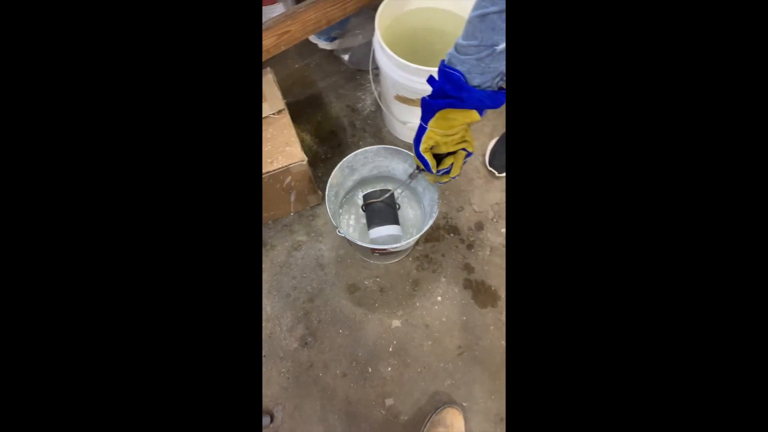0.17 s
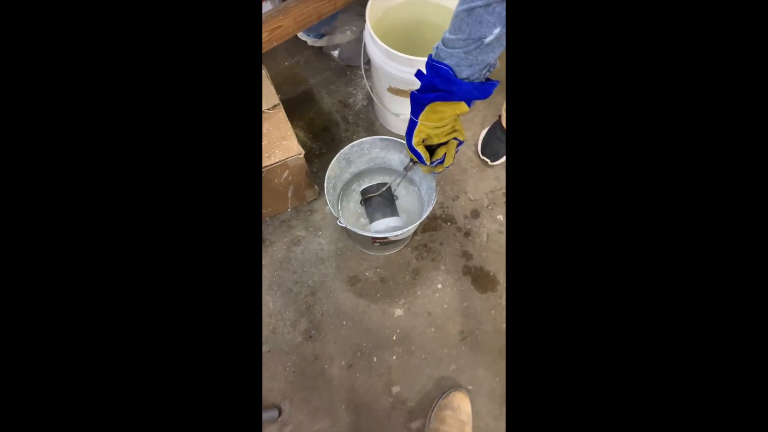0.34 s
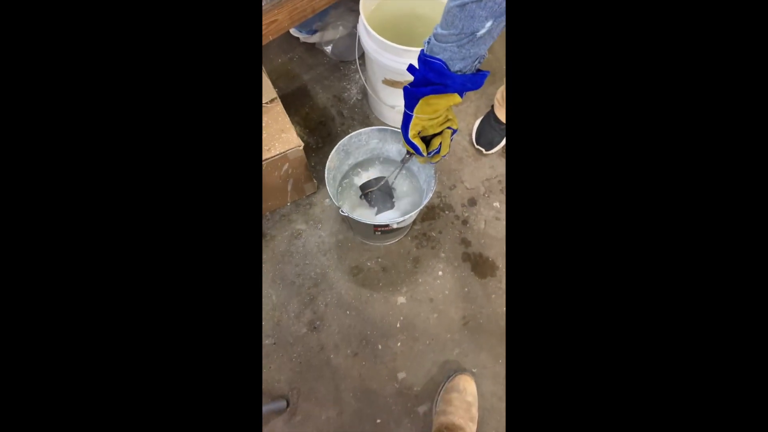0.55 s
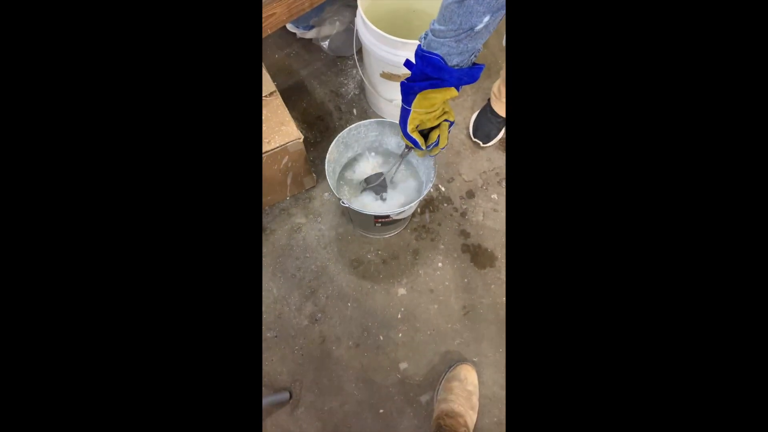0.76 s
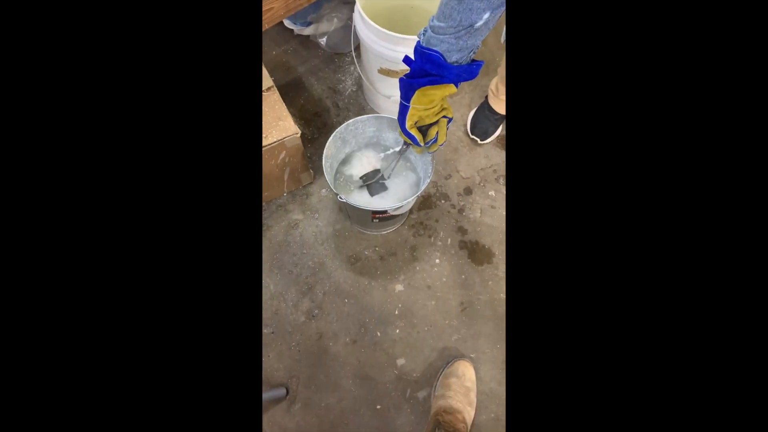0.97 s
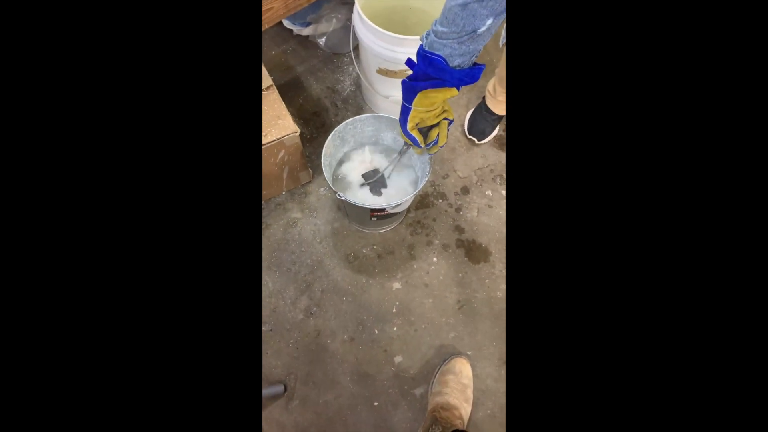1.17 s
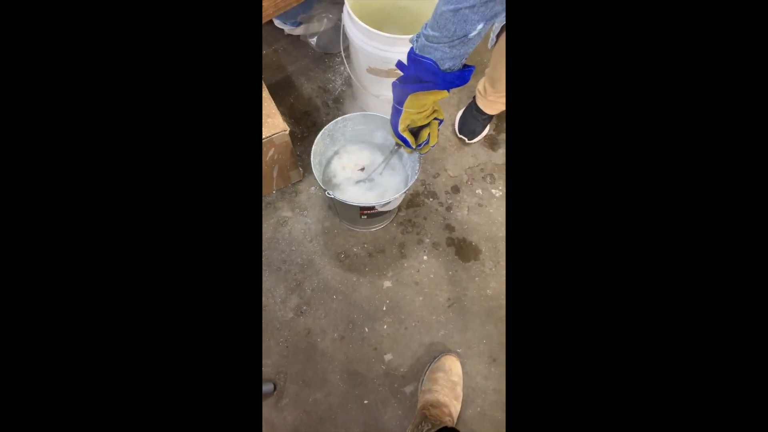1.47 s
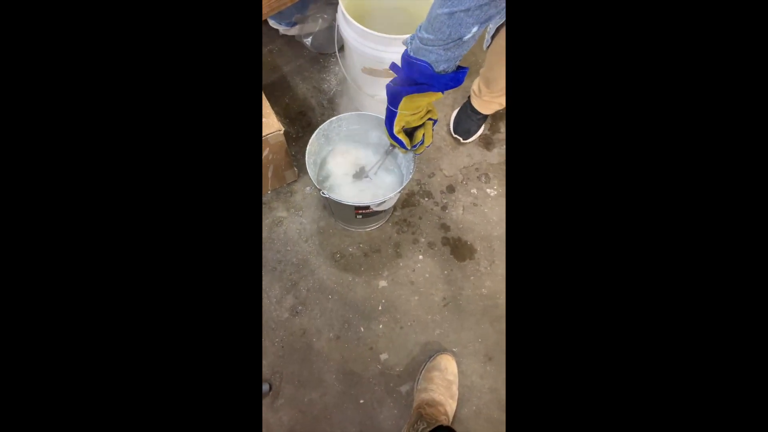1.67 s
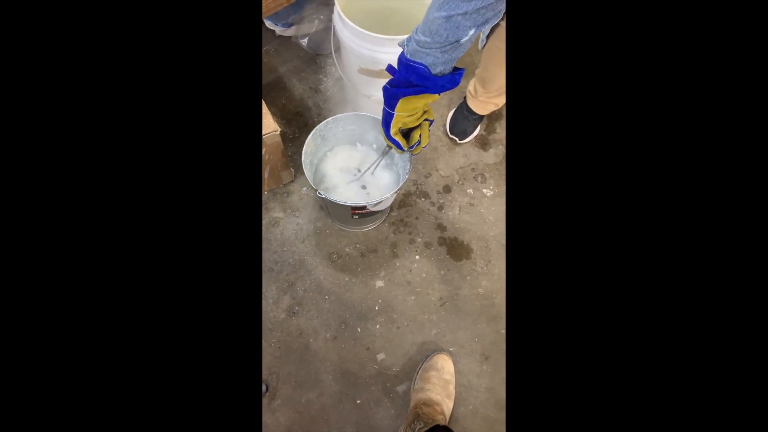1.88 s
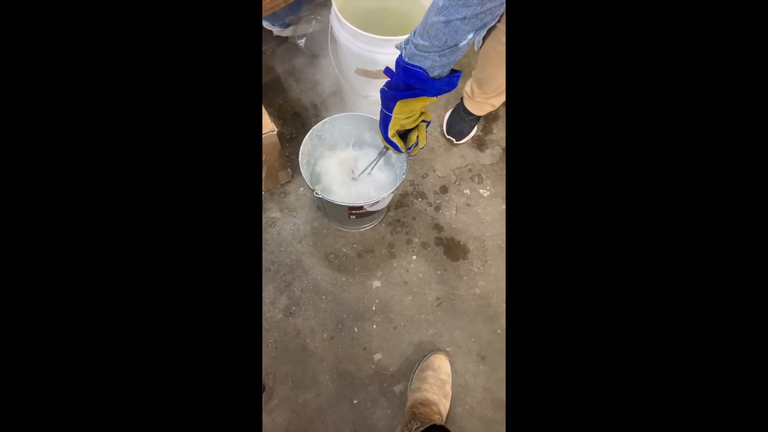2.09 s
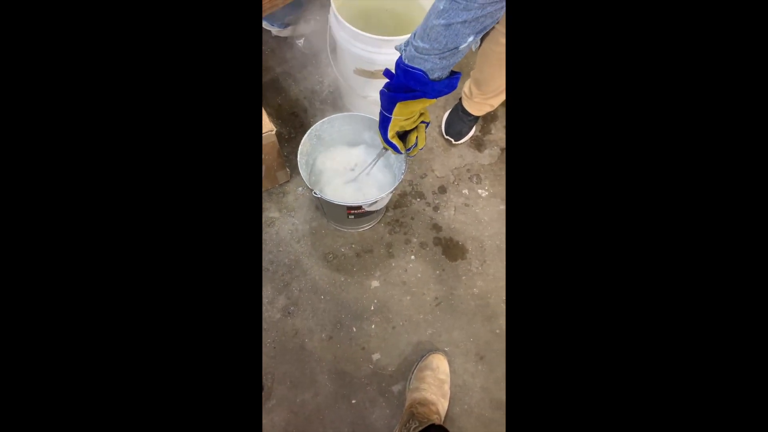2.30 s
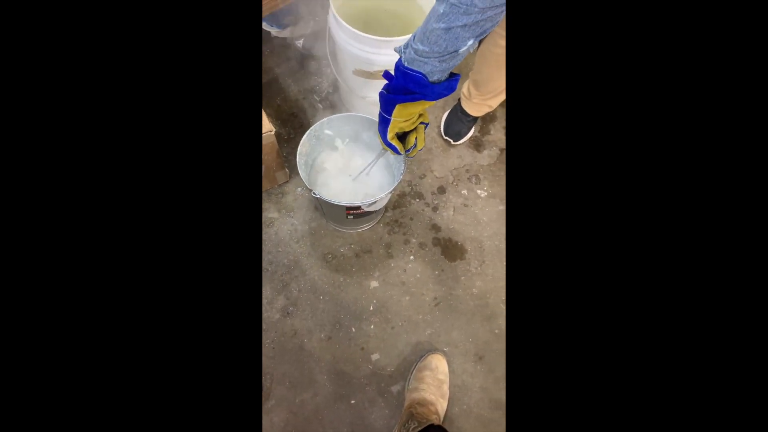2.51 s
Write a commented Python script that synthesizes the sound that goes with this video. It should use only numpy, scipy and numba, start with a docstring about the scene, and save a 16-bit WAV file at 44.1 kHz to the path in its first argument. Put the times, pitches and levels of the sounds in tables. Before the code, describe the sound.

Hot metal quenched in a bucket of water, close up in a workshop. Faint hum and room noise, a tiny tick, then at 0.1 s a loud steam burst with a quickly falling note, ringing the bucket until 0.2 s. Bright sizzle and gurgling boil follow, with sharp snaps near 0.25 and 0.7 s. A strong plop hits at 1.7 s; the fizz thins unevenly while low bubbling and steam puffs continue to 2.6 s.

```python
"""A low hum, thin high whines and quiet room noise are heard faintly first, then a faint tick.
A hot metal mould plunges into a bucket of water in a workshop: a steam pocket bursts open with a falling
note, made by a sine and by noise in a swept resonance. The water boils on the metal: filtered random impulses
fizz, simmer and rumble. Decaying noise gives the snaps, swept noise resonances the puffs and gurgles, and short
cosine bursts the plops. Two channels carry direct sound and ever-changing reflections."""
import sys
import numpy as np
from scipy import signal
from scipy.fft import rfft, irfft, next_fast_len
from scipy.io import wavfile
from scipy.ndimage import map_coordinates
from numba import njit

SR = 44100
rng = np.random.default_rng(int(sys.argv[2]) if len(sys.argv) > 2 else 0)


def waveform_to_disk(signal):
    """Save audio, clipped to [-1, 1], as 16-bit WAV at the path in sys.argv[1]."""
    frames = np.transpose(np.atleast_2d(signal))
    scaled = np.clip(frames, -1, 1) * 32767
    samples = np.round(scaled).astype(np.int16)
    wavfile.write(sys.argv[1], SR, samples)


N = 116865
TIME_S = np.arange(N) / SR

# Levels and spectra below are relative: the functions add their own trims and fluctuations.
# Steady faint tones, a low hum and thin high whines: (frequency [Hz], level [dB])
STEADY_TONES = [(290, -56), (1174, -58.5), (2363, -66), (5674, -55.5)]
# Spectrum of the room noise: (frequency [Hz], level [dB])
ROOM_SPECTRUM = [(20, -40), (120, 10), (230, -1.5), (290, -8), (380, -4), (1200, -14.5), (3000, -23.5),
                 (15000, -33)]

# Sharp clicks, a faint tick before the plunge, then snaps: (time [s], peak level [dB])
SNAP_EVENTS = [(.0853, -23), (.2355, -16), (.2695, -11), (.2875, -15), (.594, -13), (.7075, -4),
               (.7122, -10), (.78, -10), (1.3815, -14)]
SNAP_DECAY_S = 0.00065
# Spectrum of the clicks: (frequency [Hz], level [dB])
SNAP_SPECTRUM = [(1000, -25), (4000, -8), (7000, -1), (15000, -3)]

ENTRY_S, ENTRY_RISE_S = 0.097, 0.011  # the metal meets the water
# First burst of steam: (time [s], level [dB])
BURST_LEVEL = [(.07, -83), (.096, -31), (.11, -30), (.135, -19), (.174, -19.5), (.188, -32), (.218, -45),
               (.3, -58)]
POCKET_START_HZ, POCKET_END_HZ, POCKET_GROW_S = 2700, 781.6, 0.024  # the note falls as the pocket swells
# Spectrum of the steam roar: (frequency [Hz], level [dB])
ROAR_SPECTRUM = [(700, -1.0), (1900, 11), (2600, 3), (4500, -4), (9000, -23)]
# Air resonances of the bucket: (frequency [Hz], level [dB])
BUCKET_MODES = [(845, 10), (981, 1), (1120, 5), (1242, 4), (1307, 0), (1760, 3), (1876, 3), (2078, 0),
                (2280, 4), (2745, 4)]

# Finest bubbles: (time [s], level [dB])
FIZZ_LEVEL = [(.08, -25), (.12, -19.5), (.16, -26.5), (.22, -33), (.34, -27), (.45, -33.5), (.55, -31),
              (.71, -26), (.87, -31), (.99, -28), (1.1, -35.5), (1.25, -32), (1.5, -38.5), (1.6, -34),
              (1.8, -40), (1.96, -33), (2.0, -39), (2.04, -38.5), (2.225, -43.5), (2.27, -41),
              (2.38, -34.5), (2.65, -34)]
# Coarser bubbles: (time [s], level [dB])
SIZZLE_LEVEL = [(.08, -24.5), (.12, -19), (.22, -38), (.34, -30), (.46, -32.5), (.68, -29), (.95, -32),
                (1.15, -35.5), (1.31, -32), (1.5, -40), (1.62, -33.5), (1.75, -40), (1.91, -38.5),
                (1.96, -35.5), (2.0, -40), (2.06, -34.5), (2.16, -44.5), (2.23, -49), (2.265, -37.5),
                (2.65, -35)]
# Small gurgling bubbles: (time [s], level [dB])
SIMMER_LEVEL = [(.1, -32.5), (.3, -33), (.9, -34), (1.1, -36), (1.3, -34.5), (1.48, -38.5), (1.7, -32),
                (2.2, -39), (2.65, -36.5)]
# Rolling boil: (time [s], level [dB])
BOIL_LEVEL = [(.1, -40.5), (.17, -31), (.22, -36.5), (.55, -34.5), (.85, -32.5), (1.5, -33), (1.7, -31.5),
              (2.07, -32.5), (2.17, -35), (2.4, -30), (2.65, -30.5)]
# Deep churning: (time [s], level [dB])
CHURN_LEVEL = [(.1, -56), (.35, -45), (.9, -42), (1.4, -38), (2.65, -37.5)]
# Boom of the bucket: (time [s], level [dB])
BOOM_LEVEL = [(.02, -41), (.11, -39), (.22, -69), (.3, -46), (.36, -40), (1.2, -39.5), (1.55, -46.5),
              (1.9, -40), (2.65, -44.5)]
BOOM_HZ = 77.7  # lowest mode of the filled bucket
# Spectral densities of the six bubble layers: (frequency [Hz], level [dB per Hz])
FIZZ_SPECTRUM = [(2000, -17.5), (4500, -12.5), (6000, 0), (7200, 6.5), (9000, 2.5), (12000, 0.5),
                 (14000, 1.5), (16000, -53)]
SIZZLE_SPECTRUM = [(1200, -34), (2400, 1), (3000, 0), (3400, -5), (4100, 3.5), (5100, -3), (6000, -1),
                   (9000, -42.5)]
SIMMER_SPECTRUM = [(500, -10.5), (800, -8), (980, 4.5), (1250, -1.5), (1750, 0.5), (2300, -13.5),
                   (3500, -8), (8000, -86)]
BOIL_SPECTRUM = [(200, -54), (320, -21), (400, -4), (445, 1.5), (500, -3), (570, -6), (650, -8), (740, -21),
                 (1500, -50.5)]
CHURN_SPECTRUM = [(30, -56), (100, -10.5), (150, 0.5), (185, -2), (260, 2.5), (310, -13), (600, -35.5)]
BOOM_SPECTRUM = [(30, -50), (45, -25), (66, -7), (78, -1), (92, -22.5), (200, -38)]

# Puffs of steam: (time of peak [s], length [s], level [dB], pitch at peak [Hz])
PUFF_EVENTS = [(0.332, .029, -30.5, 2210), (0.395, 0.029, -32.5, 1770), (0.428, 0.013, -28.5, 1540),
               (1.238, 0.016, -31.5, 1560), (1.305, 0.03, -30, 2200), (1.385, .013, -31, 2770),
               (1.876, 0.015, -32.5, 1460), (2.084, 0.049, -33.5, 2550), (2.306, .022, -31.5, 1350),
               (2.372, 0.027, -30, 2680), (2.43, .025, -33.5, 1440), (2.516, .022, -29.5, 2800)]
PUFF_RISE_OCT_PER_S, PUFF_DAMPING = 6.1, 0.71  # a puff brightens as its bubble opens
# Spectrum of the puffs: (frequency [Hz], level [dB])
PUFF_SPECTRUM = [(300, -24), (750, -7.0), (1000, 7.5), (2000, 0.5), (3200, 4.5),
                 (4800, -5.0), (7000, 0), (14000, -16)]
# Bubbles gurgling open: (time of peak [s], length [s], level [dB], pitch at peak [Hz])
GURGLE_EVENTS = [(0.503, 0.021, -26, 1750), (0.686, 0.025, -30, 1830), (0.757, 0.02, -28, 1720),
                 (0.814, 0.021, -29.5, 1920), (.915, 0.016, -31, 1530), (0.96, 0.014, -29, 1400),
                 (1.185, 0.0089, -24.5, 1680), (1.541, .017, -28.5, 1630), (1.75, .014, -30, 1440),
                 (1.814, 0.012, -24, 1300), (1.956, 0.016, -28.5, 1360), (2.031, 0.017, -29.5, 1280),
                 (2.183, 0.02, -32, 1720), (2.344, 0.011, -31.5, 2400), (2.363, 0.016, -29, 1300),
                 (2.504, 0.022, -31, 1520), (2.578, 0.018, -28.5, 1660), (2.639, 0.012, -30.5, 1220)]
GURGLE_RISE_OCT, GURGLE_DAMPING = 0.65, 0.2  # limit of the rise on either side of the peak
# Collapses of big bubbles: (time of peak [s], peak level [dB], pitch [Hz])
PLOP_EVENTS = [(1.6977, -4.5, 1480), (1.7003, -14, 620), (1.8099, -12, 560), (2.077, -16, 460),
               (2.2572, -20, 450), (2.419, -17, 450)]

# Scattering before each source's own factor: (frequency [Hz], reflected share of the power [0 to 1])
SCATTER_SHARE = [(60, 0.51), (150, 0.021), (550, 0.07), (780, 0.89), (1100, 0.11), (1700, 0.19),
                 (2400, 0.83), (3700, 0.82), (5200, 0.56), (7000, 0.0033), (15000, 0.0022)]
# Lag of the left channel behind the right, besides the lead: (frequency [Hz], phase [rad])
PHASE_LAG = [(20, 0), (700, 1.05), (850, 2.5), (2000, 3), (2700, 4), (15000, 2.5)]
LEFT_LEAD_S = 0.000204
# Colour difference of the channels: (frequency [Hz], left minus right level [dB])
STEREO_BALANCE = [(60, 1.5), (500, 2.5), (720, 4.5), (1200, -1), (3000, -0.5), (4200, -3.5), (6500, 0.5),
                  (15000, 0.5)]
LOW_PASS_HZ = 14700


def amp(db):
    """The decibel law: a gain from a level in dB."""
    return 10 ** (np.asarray(db) / 20)


def unit(x):
    """Power normalisation: scale to rms 1."""
    return x / np.sqrt(np.mean(x ** 2) + 1e-20)


def along(points, hz):
    """Logarithmic frequency scale: (Hz, value) points are interpolated on it."""
    f, value = np.transpose(points)
    return np.interp(np.log(hz + 1), np.log(f + 1), value)


def level(points):
    """Amplitude envelope: (s, dB) points become a gain per sample."""
    return amp(np.interp(TIME_S, *np.transpose(points)))


def wobble(rate):
    """Band-limited fluctuation: a smooth random curve with `rate` knots a second."""
    knots = rng.standard_normal(int(N * rate / SR) + 4)
    return map_coordinates(knots, [TIME_S * rate])


def filtered(x, response):
    """Linear filtering: the spectrum of x times a complex response of frequency."""
    m = next_fast_len(N + SR // 2)
    return irfft(rfft(x, m) * response(np.fft.rfftfreq(m, 1 / SR)), m)[..., :N]


def coloured(x, spectrum):
    """Minimum-phase filtering: a folded cepstrum gives a causal filter of the given spectrum."""
    size = 2 ** 13
    cepstrum = irfft(np.log(amp(along(spectrum, np.fft.rfftfreq(size, 1 / SR)))))
    cepstrum[1:size // 2] *= 2
    cepstrum[size // 2 + 1:] = 0
    impulse_response = irfft(np.exp(rfft(cepstrum)))
    return signal.fftconvolve(x, impulse_response)[:N]


def background():
    """Steady tones over broadband noise: slightly unsteady sines sound faintly in a quiet room."""
    tones = sum(amp(db) * np.sqrt(2) * np.sin(2 * np.pi * hz * TIME_S + 0.15 * wobble(7.4))
                for hz, db in STEADY_TONES)
    room_noise = unit(coloured(rng.standard_normal(N), ROOM_SPECTRUM))
    return tones + amp(-51.5) * room_noise


def snaps():
    """Impulsive sound: sudden onsets of noise with exponential decay give single bright clicks."""
    strength = sum(amp(db) * (TIME_S >= s) * np.exp(-np.abs(TIME_S - s) / SNAP_DECAY_S)
                   for s, db in SNAP_EVENTS)
    return coloured(strength * np.sign(rng.standard_normal(N)), SNAP_SPECTRUM)


@njit
def resonator(x, step, damping):
    """Damped oscillator of moving frequency: returns its band-pass and high-pass outputs."""
    out, low, band = np.zeros((2, len(x))), 0., 0.
    for i in range(len(x)):
        low += step[i] * band
        high = x[i] - low - damping * band
        band += step[i] * high
        out[0, i], out[1, i] = band, high
    return out


def blown(hz, damping):
    """Turbulent excitation: noise drives a cavity resonance whose pitch moves."""
    step = 2 * np.sin(np.pi * np.minimum(hz, SR / 8) / SR)
    return resonator(rng.standard_normal(len(hz)), step, min(damping, 1.))


def bucket_air(x, width_hz):
    """Modal superposition: x rings the air resonances of the bucket in parallel."""
    def modes(f):
        return sum(amp(db) * 1j * f * width_hz / (hz * hz - f * f + 1j * f * width_hz)
                   for hz, db in BUCKET_MODES)
    return filtered(x, modes)


def plunge():
    """Cavity resonance: the swelling first steam pocket roars with a falling note and rings the bucket."""
    fall = np.exp(-np.maximum(TIME_S - ENTRY_S, 0) / POCKET_GROW_S)
    hz = POCKET_END_HZ + (POCKET_START_HZ - POCKET_END_HZ) * fall
    roar = unit(coloured(blown(hz, damping=0.26)[1], ROAR_SPECTRUM))
    note = np.sin(2 * np.pi * np.cumsum(hz * (1 + 0.044 * wobble(300))) / SR)
    envelope = level(BURST_LEVEL) * amp(1.2 * wobble(170))
    steam = envelope * (amp(-3.0) * roar + amp(-0.5) * note)
    return steam + amp(-6) * bucket_air(steam, width_hz=32)


def bubbles(spectrum, rate, spread_db, wash):
    """Shot noise: random collapses (rate per s) of scattered size on a wash of smaller ones, rms 1."""
    size = amp(spread_db * np.clip(rng.standard_normal(N), -2, 2))
    pops = (rng.random(N) < rate / SR) * size * np.sign(rng.standard_normal(N))
    return unit(coloured(unit(pops) + wash * rng.standard_normal(N), spectrum))


def hiss():
    """Modulated shot noise: swarms of tiny bubbles collapse, fine and coarse flickering partly together."""
    swarm_db = 1.4 * wobble(55)  # shared by both sizes
    fizz_db = 2 + swarm_db + 1.44 * wobble(70) + 1.2 * wobble(450)
    fizz = bubbles(FIZZ_SPECTRUM, rate=1900, spread_db=-0.5, wash=1.0)
    sizzle_db = 1.0 + swarm_db + 2.0 * wobble(90)
    sizzle = bubbles(SIZZLE_SPECTRUM, rate=1100, spread_db=3, wash=0.78)
    return amp(fizz_db) * level(FIZZ_LEVEL) * fizz + amp(sizzle_db) * level(SIZZLE_LEVEL) * sizzle


def throb(spectrum, rate, jitter, spread_db, wash, count=400):
    """Quasi-periodic impulses: large bubbles collapse in turn at a roughly even pace, rms 1."""
    draw = rng.standard_normal((count, 3))
    at = (np.cumsum(np.exp(jitter * draw[:, 0])) * SR / rate).astype(int)
    pops = np.bincount(at, amp(spread_db * draw[:, 1]) * np.sign(draw[:, 2]), minlength=N)[:N]
    return unit(coloured(unit(pops) + wash * rng.standard_normal(N), spectrum))


def blips(centre_hz, spread_oct, life_cycles, rise, size_db, count=420):
    """Damped bubble oscillation: each rings briefly, its pitch rising as it nears the surface; rms 1."""
    start = rng.integers(0, N, (count, 1))
    draw = np.clip(rng.standard_normal((count, 2)), -1.8, 1.8)
    cycles = centre_hz * 2 ** (spread_oct * draw[:, :1]) * TIME_S[:SR // 40]
    age = cycles / life_cycles
    envelope = amp(size_db * draw[:, 1:]) * np.exp(-age) * (1 - np.exp(-cycles))
    ring = envelope * np.sin(2 * np.pi * cycles * (1 + rise * np.minimum(age, 5)))
    at = start + np.arange(ring.shape[1])
    return unit(np.bincount(at.ravel(), ring.ravel(), minlength=N)[:N])


def boiling():
    """Scaling of bubble size and pitch: larger bubbles gurgle and thump, and shake water and bucket."""
    simmer = amp(-1.0 + 1.1 * wobble(38.4)) * level(SIMMER_LEVEL)
    simmer = simmer * bubbles(SIMMER_SPECTRUM, rate=600, spread_db=4.0, wash=0.71)
    ringing = blips(centre_hz=1908, spread_oct=0.526, life_cycles=7.1, rise=0.03, size_db=4.5)
    ringing = amp(-4.5) * level(SIMMER_LEVEL) * ringing
    boil = level(BOIL_LEVEL) * throb(BOIL_SPECTRUM, rate=75, jitter=0.35, spread_db=1.0, wash=0.75)
    churn = level(CHURN_LEVEL) * bubbles(CHURN_SPECTRUM, rate=200, spread_db=2.5, wash=0.72)
    sway = np.sin(2 * np.pi * BOOM_HZ * TIME_S + 0.93 * wobble(14))
    thumps = bubbles(BOOM_SPECTRUM, rate=150, spread_db=-0.5, wash=0.7)
    boom = level(BOOM_LEVEL) * (amp(-2) * sway + amp(-2.5) * thumps)
    return simmer + ringing + boil + churn + boom


def puffs():
    """Swept turbulent resonance: steam breaks the surface in short chuffs that rise in pitch."""
    out = np.zeros(N)
    for s, length, db, hz in PUFF_EVENTS:
        near = np.abs(TIME_S - s) < 2 * length
        t = TIME_S[near] - s
        chuff = unit(blown(hz * 2 ** (PUFF_RISE_OCT_PER_S * t), PUFF_DAMPING)[0])
        out[near] += amp(db) * np.exp(-2 * (t / length) ** 2) * chuff
    return coloured(out, PUFF_SPECTRUM)


def gurgles():
    """Cavity resonance: a rough note shoots upward as the opening bubble drains of steam."""
    out = np.zeros(N)
    for s, length, db, hz in GURGLE_EVENTS:
        near = np.abs(TIME_S - s) < 2 * length
        t = TIME_S[near] - s
        pitch = hz * 2 ** (GURGLE_RISE_OCT * np.tanh(t / length))
        note = unit(blown(pitch, GURGLE_DAMPING)[0])
        out[near] += amp(db) * np.exp(-2 * (t / length) ** 2) * note
    return out


def plops():
    """Heavily damped oscillation: a big bubble gives a cycle or two that swell and die at once."""
    out = np.zeros(N)
    for s, db, hz in PLOP_EVENTS:
        cycles = (TIME_S - s) * hz
        drop_db = np.maximum(-11 * cycles, 9 * cycles)  # 11 dB per cycle up, 9 down
        out += amp(db - drop_db) * np.cos(2 * np.pi * cycles)
    return out


def reflections(x, near_t60, room_t60, room_db, size=2048):
    """Time-varying reverberation: bursts all over the bucket keep changing the echo paths."""
    t, out = TIME_S[:SR // 3], np.zeros((2, N + SR))
    padded = np.pad(x, size)
    window = signal.windows.hann(size, sym=False) ** 0.5
    decay = (amp(-60 * t / near_t60) + amp(room_db - 60 * t / room_t60)) * (t > 0.001)
    for i in range(0, N + size, size // 2):
        # every half-overlapping block has fresh random tails
        tails = rng.standard_normal((2, len(t))) * decay / np.linalg.norm(decay)
        echo = signal.fftconvolve((padded[i:i + size] * window)[None], tails, axes=1)
        out[:, i:i + echo.shape[1]] += echo
    return out[:, size:size + N]


def space(x, scatter):
    """Direct and scattered fields: direct sound leads at left, near opposite polarity above the bass."""
    echo = reflections(x, near_t60=0.043, room_t60=0.47, room_db=-20.0)

    def share(f):
        return np.clip(scatter * along(SCATTER_SHARE, f), 0, 1)

    def direct_response(f):
        turn = 2 * np.pi * f * LEFT_LEAD_S - along(PHASE_LAG, f)
        return np.sqrt(1 - share(f)) * np.exp(np.outer([0.5j, -0.5j], turn))

    return filtered(x, direct_response) + filtered(echo, lambda f: np.sqrt(share(f)))


def scene():
    """Superposition: boiling starts as the metal is wet; clicks, pocket, gurgles and plops are more direct."""
    wet = (1 + np.tanh((TIME_S - ENTRY_S) / ENTRY_RISE_S)) / 2
    diffuse = background() + wet * (hiss() + boiling()) + puffs()
    distinct = snaps() + plunge() + gurgles() + plops()
    return space(diffuse, scatter=0.91) + space(distinct, scatter=0.29)


def record(dry):
    """Stereo balance and band limit: the channels differ a little in colour; the sound is low-passed."""
    def response(f):
        return amp(np.outer([0.5, -0.5], along(STEREO_BALANCE, f))) * (f < LOW_PASS_HZ)
    return filtered(dry, response)


dry = scene()
out = record(dry)
waveform_to_disk(out)
```